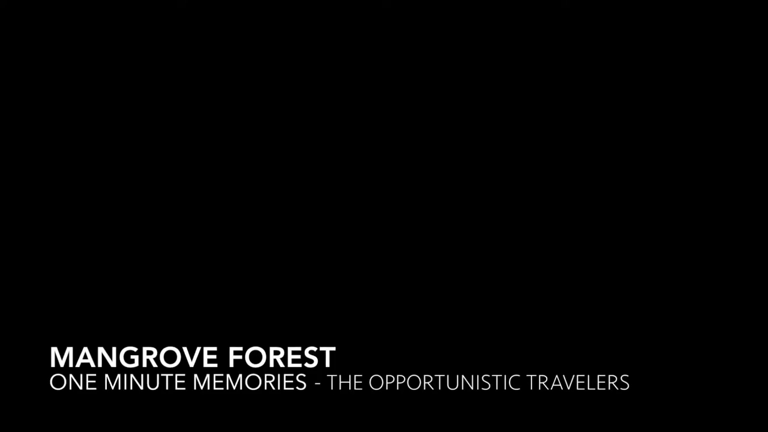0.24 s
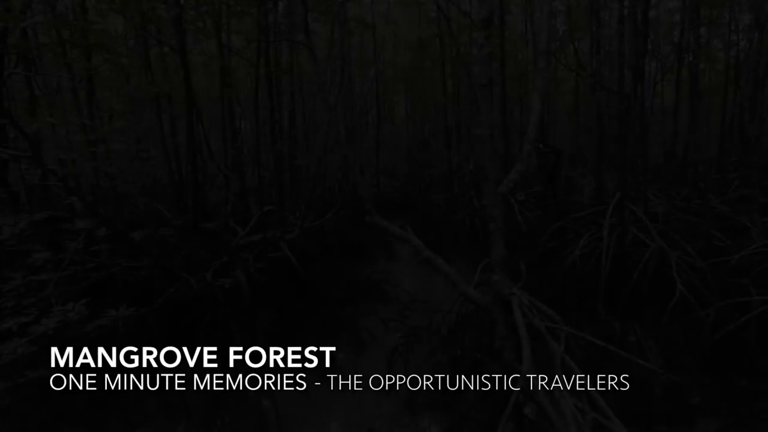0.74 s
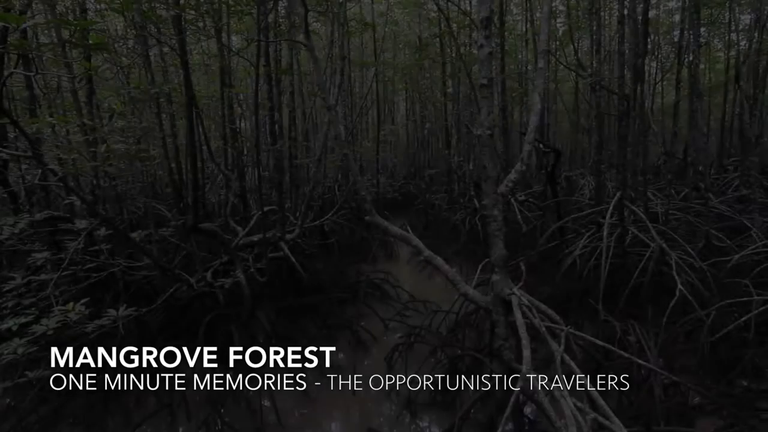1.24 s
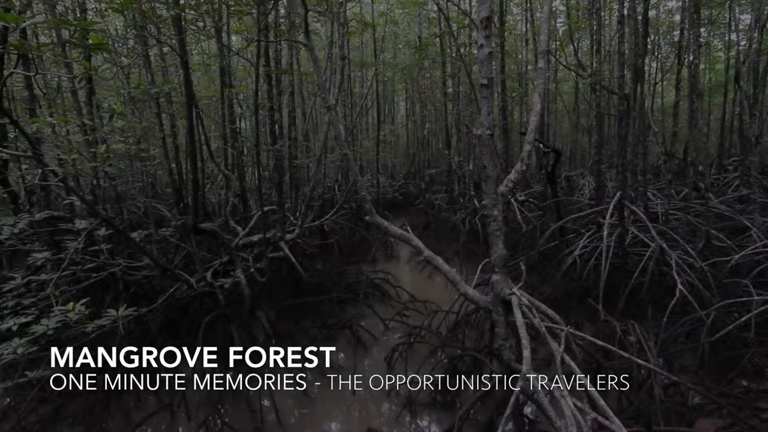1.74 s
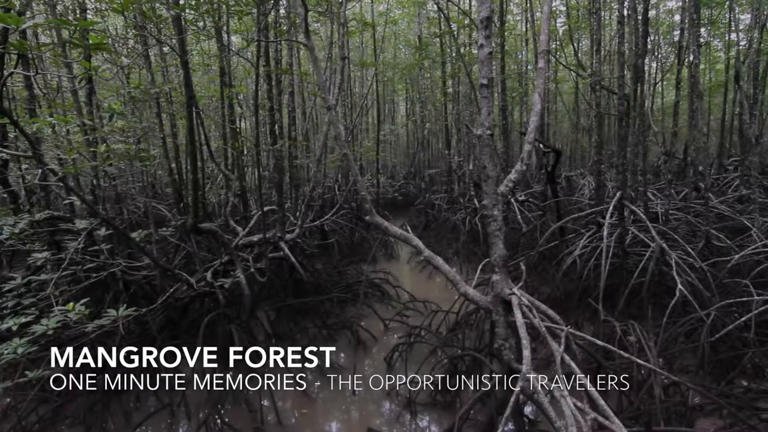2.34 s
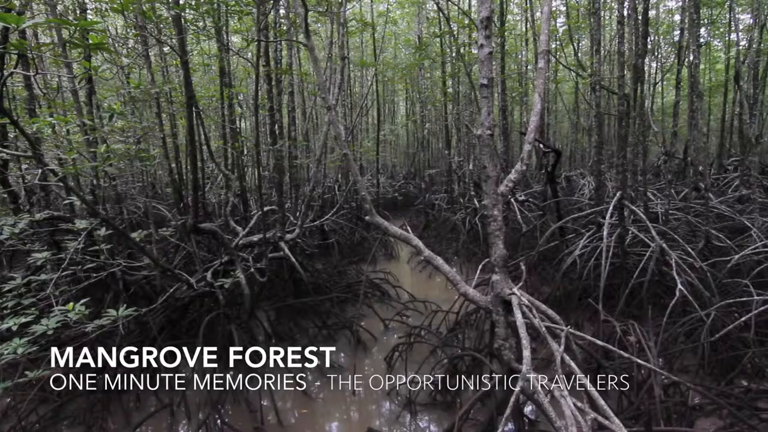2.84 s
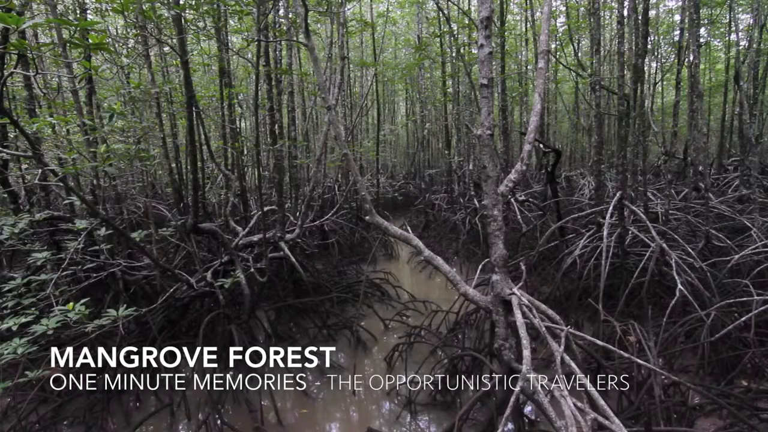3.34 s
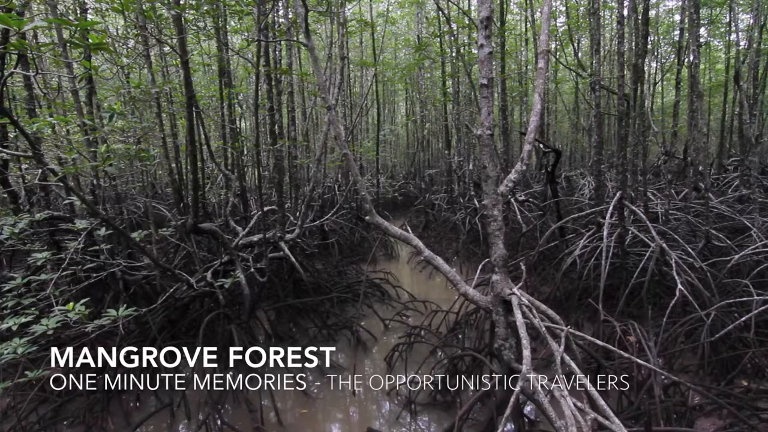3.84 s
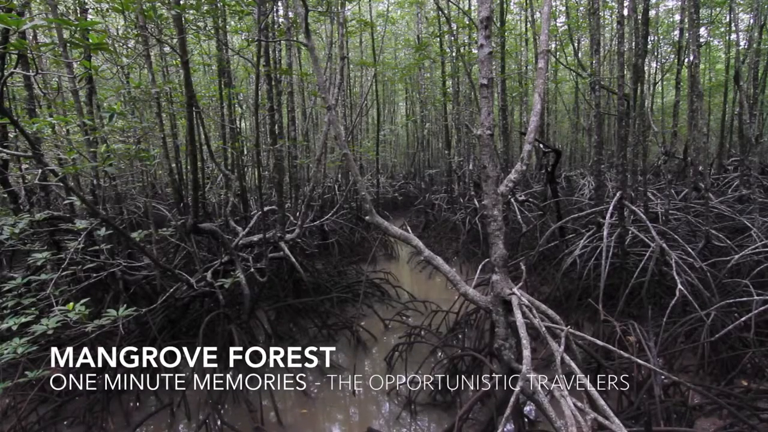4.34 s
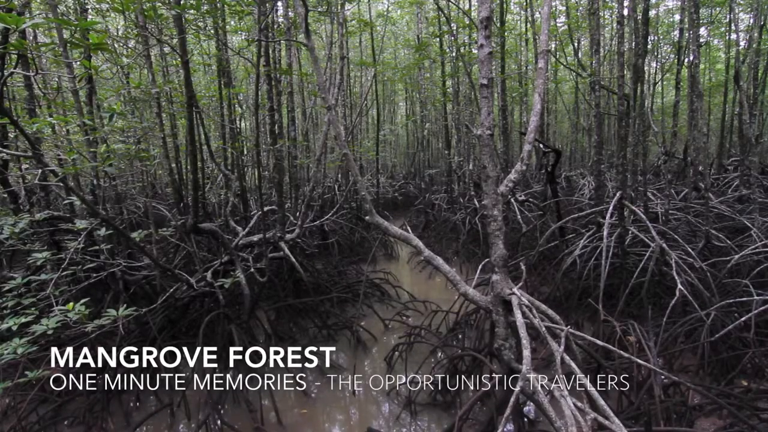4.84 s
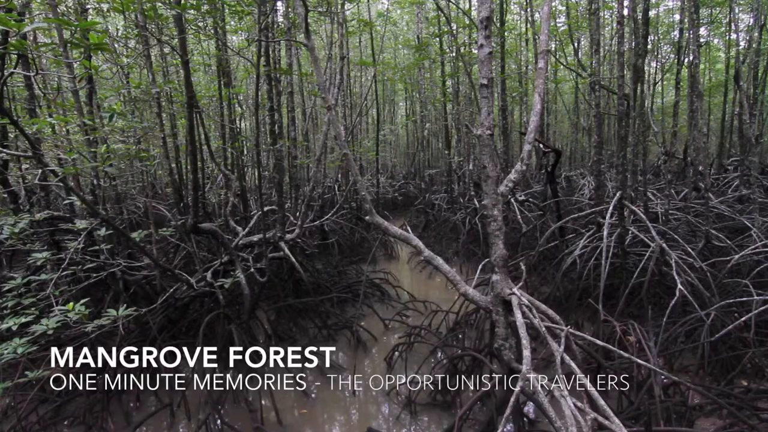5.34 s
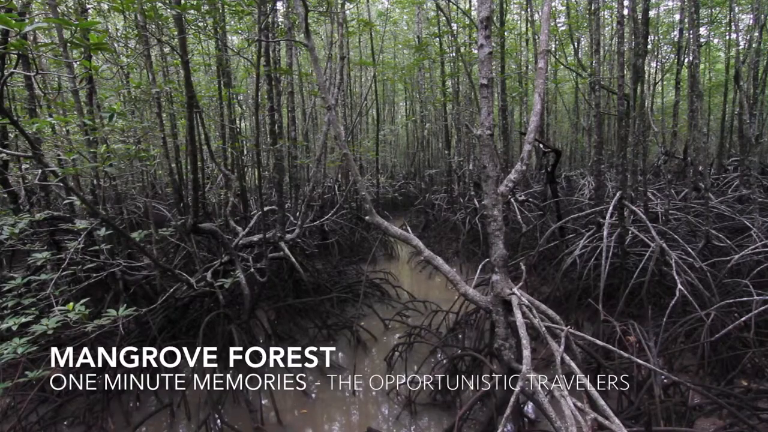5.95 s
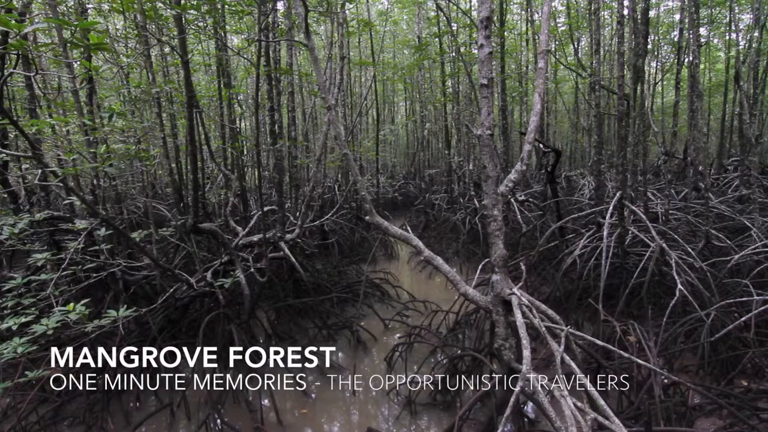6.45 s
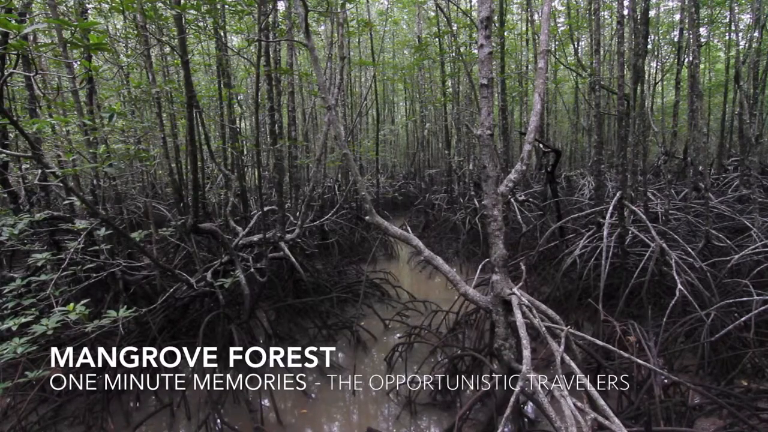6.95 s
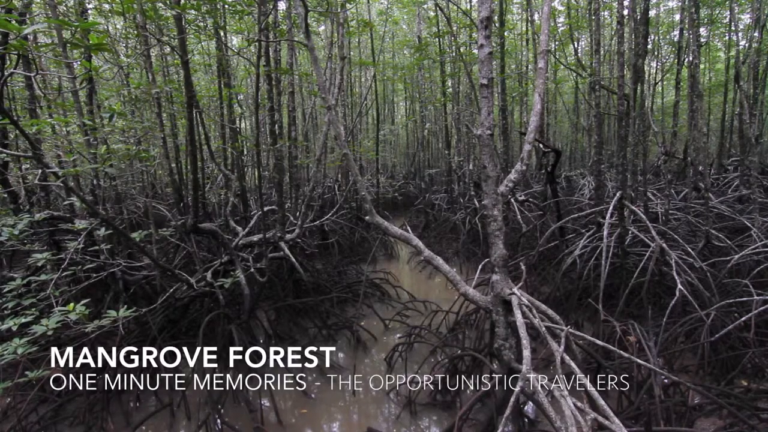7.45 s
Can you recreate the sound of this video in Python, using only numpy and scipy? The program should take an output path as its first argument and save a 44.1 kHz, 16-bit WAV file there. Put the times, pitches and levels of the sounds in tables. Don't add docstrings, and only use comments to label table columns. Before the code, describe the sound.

A dense chorus of cicadas fades in over a swamp forest, a shrill steady high buzz with a very faint low rumble beneath.

```python
import sys
import numpy as np
from scipy import signal
from scipy.fft import rfft, irfft, next_fast_len
from scipy.io import wavfile

SR = 44100
rng = np.random.default_rng(int(sys.argv[2]) if len(sys.argv) > 2 else 0)


def output_pcm(signal):
    pcm = np.clip(np.atleast_2d(signal).T, -1, 1) * 32767
    wavfile.write(sys.argv[1], SR, np.round(pcm).astype(np.int16))


def voltage_ratio(decibels):
    exponent = np.asarray(decibels, float) / 20
    return 10 ** exponent


N = 339129


def colour(x, points):
    hz, db = np.transpose(points)
    size = next_fast_len(N)
    bins_hz = np.maximum(np.fft.rfftfreq(size, 1 / SR), 1)
    gain = voltage_ratio(np.interp(np.log(bins_hz), np.log(hz), db, -150, -150))
    out = irfft(rfft(x, size) * gain, size)[:N]
    return out / np.std(out)


def drift(rate_hz):
    pole = np.exp(-80 * np.pi * rate_hz / SR)
    noise = rng.standard_normal(N // 40 + 4002)
    slow = signal.lfilter([1], [1, -2 * pole, pole * pole], noise)[4000:]
    return np.interp(np.arange(N) / 40, np.arange(len(slow)), slow / np.std(slow))


# frequency in Hz, density in dB per Hz.
RUMBLE_SPECTRUM = [(12, -46), (20, -13), (64, -17), (125, -4), (270, -2.5), (302, 0.5), (420, -5),
                   (2060, -17), (2860, -16.5), (3900, -21.5), (5070, -42), (8580, -120)]


def far_rumble():
    t = np.arange(N) / SR
    start_db, growth_db_per_s = -28, 0.3743
    level_db = start_db + growth_db_per_s * t + .5 * drift(0.87)
    return colour(rng.standard_normal(N), RUMBLE_SPECTRUM) * voltage_ratio(level_db)


# start in seconds, peak in dB, pitch in Hz, time to fall 60 dB in seconds.
KNOCKS = [(1.2, -58.5, 55, .12), (1.33, -65, 55, .1), (4.34, -75, 40, .12), (4.95, -66, 49.8, .12),
          (5.125, -62, 45.3, .1), (7.233, -51, 69, 0.079), (7.428, -46, 58, 0.1), (7.465, -44, 85, .08),
          (7.478, -50, 141, 0.064), (7.514, -51, 75, .09), (7.675, -51, 55, .1)]


def mount_knocks():
    out = np.zeros(N)
    onset_s = 0.0036
    for start_s, peak_db, hz, fall_s in KNOCKS:
        t = np.maximum(np.arange(N) / SR - start_s, 0)
        rise = 1 - np.exp(-t / onset_s)
        turns = hz * (t + onset_s * rise)
        out -= voltage_ratio(peak_db + 8.0 - 60 * t / fall_s) * rise * np.sin(2 * np.pi * turns)
    return out


# start in seconds, length in seconds, rms level in dB, centre in Hz, width in Hz.
RUSTLES = [(1.318, .03, -70, 1700, 900), (1.32, .065, -65.5, 13000, 5000), (3.797, .008, -60, 13000, 3500),
           (3.804, .033, -55, 2900, 2400), (3.807, .014, -55, 12800, 3500), (3.82, .045, -63, 12500, 3500),
           (6.612, .075, -59, 2000, 900), (6.63, .1, -58.5, 2800, 700), (6.7, .1, -65, 3270, 200),
           (6.69, .22, -64, 2800, 900), (7.31, .04, -66, 3300, 200), (7.1, .32, -62, 75, 80),
           (7.41, .2, -61, 110, 130)]


def leaf_rustles():
    out = np.zeros(N)
    for start_s, length_s, db, hz, width_hz in RUSTLES:
        at, size = round(start_s * SR), round(length_s * SR)
        grain_levels = voltage_ratio(1.5 * rng.standard_normal(128)).repeat(128)
        grains = rng.standard_normal(16384) * grain_levels
        edges_hz = [hz - width_hz / 2, hz + width_hz / 2]
        band = signal.butter(2, edges_hz, "band", fs=SR, output="sos")
        burst = signal.sosfilt(band, grains)[2048:2048 + size]
        out[at:at + size] += voltage_ratio(db) * burst / np.std(burst) * signal.windows.tukey(size, .5)
    return out


# start in seconds, length in seconds, peak in dB, first pitch in Hz, last pitch in Hz.
CREAK = (1.313, .072, -60.5, 1220, 1140)


def board_creak():
    start_s, length_s, db, start_hz, end_hz = CREAK
    share = np.clip((np.arange(N) / SR - start_s) / length_s, 0, 1)
    turns = length_s * (start_hz * share + (end_hz - start_hz) * share ** 2 / 2)
    phase = 2 * np.pi * turns
    stutter = 1 - .2 * np.cos(2 * np.pi * 2.6 * share)
    swell = np.sqrt(np.sin(np.pi * share ** .7)) * stutter
    return voltage_ratio(db) * swell * (share < 1) * (np.sin(phase) + .33 * np.sin(2 * phase))


# time in seconds, peak in dB.
TWIG_TICKS = [
    (5.1277, -35),
]


def twig_tick():
    out = np.zeros(N)
    for start_s, peak_db in TWIG_TICKS:
        out[round((start_s + .0015) * SR)] = -voltage_ratio(peak_db + 21.0)
    return signal.sosfilt(signal.butter(2, [1300.0, 6000.0], "band", fs=SR, output="sos"), out)


# multiple, level in dB if odd, level in dB if even.
TYMBALS = [(12, 3, -10), (15, -1, -10), (20, 0, -4), (24, -1, -14), (31, 1, -8), (35, 1, 2), (39, 3, -1),
           (44, -3, -1), (47, -4, -12), (60, -6, -8)]


def singer(rate_hz, wobble, paths):
    k = np.arange(11, 62)
    multiple, odd_db, even_db = np.transpose(TYMBALS)
    line_db = np.where(k % 2, np.interp(k, multiple, odd_db), np.interp(k, multiple, even_db))
    lines = np.zeros((paths, 2049), complex)
    lines[:, k] = voltage_ratio(line_db)
    cycles = irfft(lines * np.exp(2j * np.pi * rng.random(lines.shape)))
    turns = np.cumsum(rate_hz * (1 + wobble * drift(25.646))) / SR
    at = (turns % 1 * cycles.shape[1]).astype(int)
    gains = np.array([np.ones(N)] + [.7 * drift(16) for _ in cycles[1:]])
    gains /= np.sqrt(np.sum(gains ** 2, axis=0))
    out = sum(gain * cycle[at] for gain, cycle in zip(gains, cycles))
    return out / np.std(out)


def far_crowd(count):
    t = np.arange(N) / SR
    rates = rng.uniform([222, .6], [268, 1.9], (count, 2))
    crowd = sum(singer(start + climb * t, wobble=.007, paths=1) for start, climb in rates)
    return crowd / np.sqrt(2 * count) + 1.22 * rng.standard_normal(N)


RATES = [
    (240.5, 1.65, 0),
    (250.4, 1.6, .1),
    (258, 1.55, .27),
]
# first level in dB against the crowd, last level in dB, middle of glide in seconds, spread in seconds.
EFFORT = [
    (-8.5, -1, 2.7, 1.6),
    (-5, -22, 3.3, .9),
    (-21, -7.5, 2.3, 1.1),
]


def near_singers():
    t = np.arange(N) / SR
    tired_s = np.maximum(t - 5.5, 0)
    wobbles, path_counts = [.0015, .002, .0025], [7, 5, 5]
    out = np.zeros(N)
    for rate, effort, wobble, paths in zip(RATES, EFFORT, wobbles, path_counts):
        start, climb, tiring = rate
        first_db, last_db, middle_s, spread_s = effort
        rate_hz = start + climb * t - tiring * tired_s ** 2
        glide = (1 + np.tanh((t - middle_s) / spread_s)) / 2
        out += voltage_ratio(first_db + (last_db - first_db) * glide) * singer(rate_hz, wobble, paths)
    return out


# frequency in Hz, density in dB per Hz.
AIR_SAC = [(2900, -50), (3250, -43.5), (3900, -40), (4100, -33.5), (4300, -22), (4450, -18), (4600, -11),
           (4780, -7), (4900, -3), (5050, -2), (5300, -2), (5400, -5), (5680, -7), (5950, -18.5),
           (6250, -23.5), (6500, -38), (6900, -66)]
# frequency in Hz, density in dB per Hz.
OVERTONES = [(6200, -27), (6500, 0.5), (6950, 0), (7250, 2), (8300, 2), (8600, -2), (9300, -7.5),
             (9800, -4.5), (10500, -3.5), (11400, -14), (12000, -11.5), (13500, -16.5), (15700, -16)]


def cicadas():
    voices = far_crowd(count=18) + near_singers()
    song = colour(voices, AIR_SAC) * voltage_ratio(0.067 * drift(7.1))
    upper = colour(voices, OVERTONES) * voltage_ratio(-19 + 0.47 * drift(6.6))
    return song + upper


def fade_in():
    t = np.arange(N) / SR
    fade_s, bend, start_db = 2.84, 1.62, -37.5
    full_db, easing_db_per_s = -27, 0.3
    rise = voltage_ratio(start_db) + np.sin(np.pi / 2 * np.minimum(t / fade_s, 1)) ** bend
    return voltage_ratio(full_db - easing_db_per_s * np.maximum(t - fade_s, 0)) * rise


def scene():
    forest = fade_in() * (far_rumble() + cicadas())
    nearby = mount_knocks() + leaf_rustles() + board_creak() + twig_tick()
    return (forest + nearby)[None]


def band_limit(x):
    return signal.sosfilt(signal.butter(12, 15640, fs=SR, output="sos"), x)


def record(dry):
    return band_limit(dry)


dry = scene()
out = record(dry)
output_pcm(out)
```